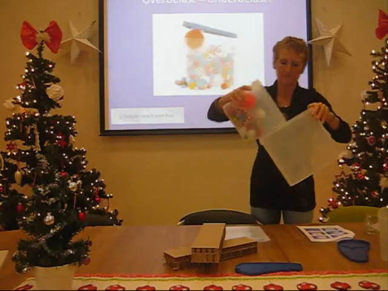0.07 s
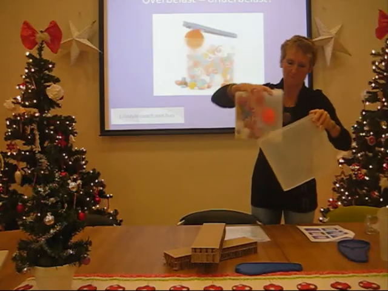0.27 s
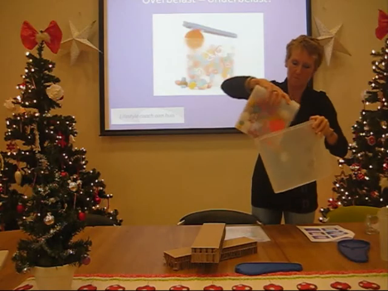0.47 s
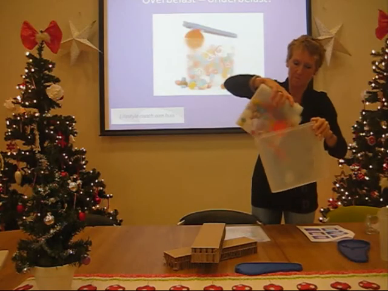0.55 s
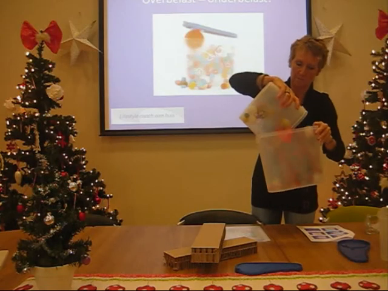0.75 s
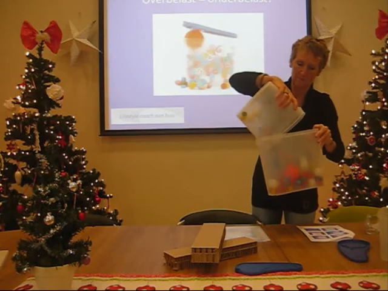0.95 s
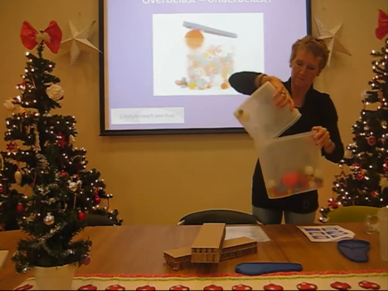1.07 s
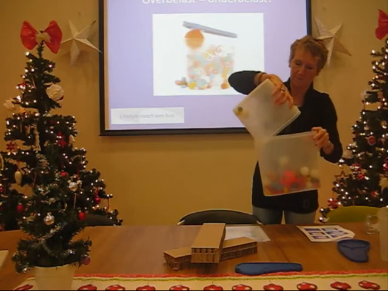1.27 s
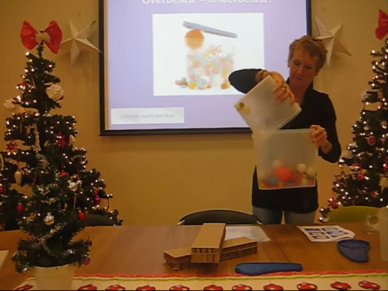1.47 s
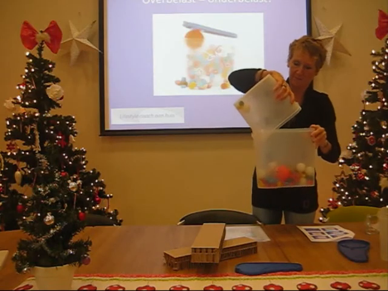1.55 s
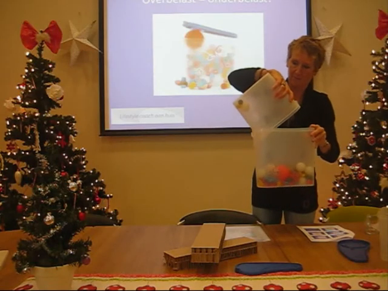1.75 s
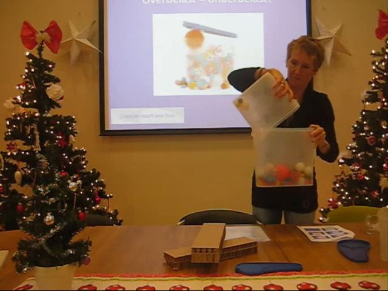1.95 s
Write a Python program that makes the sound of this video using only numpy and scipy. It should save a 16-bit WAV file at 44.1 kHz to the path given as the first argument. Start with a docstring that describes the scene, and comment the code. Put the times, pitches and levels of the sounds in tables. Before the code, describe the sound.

Small hard balls pour from a plastic box into a plastic tub. They shift and tick, fall in a loud clatter with hollow thumps, then the last few drop singly, a few metres away in a slightly echoing room.

```python
"""Small hard balls pour from a plastic box into a plastic tub, a few metres away in a meeting room.
They shift and tick, then fall in a dense clatter: every contact is a tiny crack that sets the tub
ringing, and a few heavy balls thump on its floor. The last ones drop singly and settle while
the room rings out over a soft hush and a faint electrical whine."""
import sys
import numpy as np
from scipy import signal
from scipy.fft import rfft, irfft, next_fast_len
from scipy.io import wavfile

SR = 44100
rng = np.random.default_rng(int(sys.argv[2]) if len(sys.argv) > 2 else 0)


def store_wav(level_fs):
    """Save 16-bit WAV to argv[1]."""
    pcm = np.round(np.clip(np.atleast_2d(level_fs), -1, 1) * 32767)
    wavfile.write(sys.argv[1], SR, pcm.T.astype(np.int16))


N = 88200
RADIATE_HZ = 282  # the thin plastic gives off little sound below this


def stream(hits_per_s=290, scatter_db=2.5, wall_fade_s=0.13, clatter_db=-3, wall_db=-12.5):
    """Balls collide at random; each contact clacks and rings the tub's tones in a new mix."""
    # The course of the pour. Each row: time in seconds, relative level in dB, treble boost in dB.
    pour = [(0, -36.5, -11), (.135, -40.5, -9), (.2, -30, -21), (.24, -22.5, -14), (.29, -24, 0.5),
            (.35, -16, -3), (.47, -17.5, 1), (0.508, -11.5, -1.5), (.54, -20.5, 7.5), (.66, -21, 1.5),
            (.715, -16, 6), (.745, -26.5, 12), (.86, -18, 4.5), (.95, -17, 0), (1.02, -16, 1.5),
            (1.135, -17.5, 2.5), (1.25, -17.5, -2), (1.29, -20.5, -12), (1.36, -16.5, -11),
            (1.43, -20.5, -9), (1.49, -28.5, -14), (1.57, -28.5, -17), (1.62, -38, -29), (1.68, -26, -13),
            (1.739, -29.5, -13), (1.81, -59, -19)]
    # The tones of the tub's walls and air. Each row: pitch in Hz, relative level in dB.
    wall_tones = [(310, -6.5), (350, -4), (404, -4.5), (446, -1.5), (515, -3), (940, -6), (1120, -5)]
    count = int(hits_per_s * N / SR)
    times = np.clip((np.arange(count) + rng.uniform(-2, 2, count)) / hits_per_s, 0, N / SR)
    pour_s, level_db, bright_db = np.transpose(pour)
    force = unit(amp(scatter_db * np.clip(rng.standard_normal(count), -2, 2)))
    force = force * amp(np.interp(times, pour_s, level_db)) * np.sqrt(SR / hits_per_s)
    pitch = 2182 * np.exp(0.615 * rng.standard_normal(count))  # Hz, different for each contact
    clatter = place(times, force[:, None] * contacts(np.interp(times, pour_s, bright_db), pitch))
    t, walls = np.arange(SR // 4) / SR, np.zeros(N)
    for hz, db in wall_tones:
        ring = np.sin(2 * np.pi * hz * t) * amp(-60 * t / wall_fade_s)
        blows = place(times, (force * rng.uniform(-2, 2, count))[:, None])
        walls += amp(db) * signal.fftconvolve(blows, ring / np.linalg.norm(ring))[:N]
    return amp(clatter_db) * clatter + amp(wall_db) * radiated(walls, RADIATE_HZ) / 2


def contacts(bright_db, pitch, crack_s=0.0004, ring_s=0.0035, ring_db=-5.5, size=1024):
    """One clack of equal energy per ball: a crack and a brief plastic ring around its pitch."""
    # The tone colour of a contact. Each row: frequency in Hz, relative level in dB.
    colour = [(40, -28), (110, -29), (200, -12.5), (330, 0), (1600, -1), (2800, -3), (4200, -7.5),
              (6000, -10.5), (8000, -18.5), (12000, -22.5), (15500, -34.5)]
    t, hz = np.arange(size) / SR, np.fft.rfftfreq(size, 1 / SR)
    envelope = (np.exp(-t / crack_s) + amp(ring_db) * np.exp(-t / ring_s)) * (1 - np.exp(-t / 0.00022))
    burst = rng.standard_normal((len(pitch), size)) * envelope
    peak_db, sharpness = 7, 6
    peak = 1 + amp(peak_db) / np.hypot(1, 2 * sharpness * (hz / pitch[:, None] - 1))
    treble_share = along([(1200, 0.033), (3000, 0.4), (7000, 0.94)], hz)
    gain = peak * amp(along(colour, hz) + bright_db[:, None] * treble_share)
    clack = irfft(rfft(burst) * causal(gain))
    return clack / np.linalg.norm(clack, axis=1, keepdims=True)


def clacks(gain_db=12, neighbours=4, jostle_s=0.007, jostle_db=-12):
    """Hard hits on the tub's wall stand out, each in a small flurry of jostled neighbours."""
    # Each row: start in seconds, relative level in dB, pitch in Hz, treble boost in dB.
    hard_hits = [(0.1006, -21, 1000, 1), (0.1574, -16.5, 990, -11), (0.1911, -17, 1060, -13),
                 (0.2476, 1.5, 1080, -6), (0.2703, 1, 1410, -3), (0.3945, -8, 2900, 7),
                 (0.4088, -3.5, 2230, -4), (.4474, -5, 1560, -14), (0.495, -3.5, 1360, -1),
                 (0.5127, -2.5, 1240, -2), (.564, -0.5, 1590, 5.5), (.627, -6, 1110, 6),
                 (0.6719, -7.5, 1470, -9), (0.7036, 1, 2660, 5), (0.7229, 2, 2200, -4),
                 (0.7684, -6, 2600, 11), (0.7747, -4.5, 1670, 10.5), (.778, 0, 1200, 2),
                 (0.792, 0, 1170, -3.5), (.8042, -5.5, 1590, -11), (.823, -1, 1230, 2),
                 (.9004, 2, 2550, -1), (0.9986, -3, 1430, 1), (1.1101, -5, 1580, 9), (1.1325, -4, 2920, 12),
                 (1.275, -2, 1700, 11), (1.5105, -14, 2400, 0), (1.5534, -6.5, 2500, -1),
                 (1.5826, -10.5, 2950, -8), (1.6463, -11, 1470, -8), (1.6793, -22, 5470, -1)]
    starts, db, pitch, bright_db = np.transpose(hard_hits)
    force = amp(db + gain_db)[:, None]
    hits = place(starts, force * contacts(bright_db, pitch))
    for offset in rng.uniform(-.7, .7, (len(starts), neighbours)).T:
        hits += place(starts + jostle_s * offset, amp(jostle_db) * force * contacts(bright_db, pitch))
    return radiated(hits, edge_hz=517, order=2)  # a hit on the side wall has little bass


def thumps(gain_db=-10, reach_hz=99, delay_s=0.002285):
    """Heavy balls drum on the tub's floor; where they land decides which tones answer."""
    # Each row: time in seconds, relative level in dB, the frequency in Hz it stirs most.
    landings = [(.315, -6, 476), (.625, 4, 502), (0.65, 1, 300), (.669, 3.5, 435), (.693, -2, 380),
                (.897, -7, 450), (1.273, -5, 404), (1.334, -6, 447), (1.438, -0.5, 480), (1.462, -6.5, 314),
                (1.55, -9, 465), (1.643, -4.5, 493)]
    # The floor's tones. Each row: pitch in Hz, relative level in dB, seconds to fade by 60 dB.
    floor_tones = [(325, -4.5, .045), (407, -1, .04), (446.2, -6.5, .09), (526, -6, .03), (593, -8, .04)]
    times, db, centre_hz = np.transpose(landings)
    floor_hz = np.array(floor_tones)[:, 0]
    mix = 1 / np.hypot(1, (floor_hz - centre_hz[:, None]) / reach_hz) ** 2
    thuds = amp(db + gain_db)[:, None] * (mix @ ringing(floor_tones))
    return radiated(place(times + delay_s, thuds), RADIATE_HZ)


def box_ring():
    """A ball that knocks the emptied box sets it ringing with a short, high tone."""
    # Each row: start in seconds, relative level in dB.
    ring_hits = [(.7228, -9), (0.7743, -19)]
    # The emptied box's tones. Each row: pitch in Hz, relative level in dB, seconds to fade by 60 dB.
    box_tones = [(1615, -0.5, 0.054), (2964, -3.5, 0.031)]
    starts, db = np.transpose(ring_hits)
    return place(starts, amp(db)[:, None] * ringing(box_tones).sum(axis=0))


def chatters(rise_s=0.00095, decay_s=0.0048):
    """Two balls glance off each other with a thin buzz a few milliseconds long."""
    # Each row: start in seconds, relative level in dB.
    glances = [(.209, -34), (1.3884, -10.5), (1.411, -25), (1.421, -21), (1.697, -29)]
    # The tone colour of the buzz. Each row: frequency in Hz, relative level in dB.
    colour = [(300, -70), (2500, -14), (3900, 3.5), (5000, -6.5), (6200, -8.5), (10500, -13.5),
              (15000, -22)]
    starts, db = np.transpose(glances)
    t = np.arange(SR // 10) / SR
    envelope = place(starts, amp(db)[:, None] * np.exp(-t / decay_s) * (1 - np.exp(-t / rise_s)))
    return envelope * noise(colour)


def bumps():
    """Soft low knocks as the tipped box meets the tub's rim."""
    # Each row: start in seconds, relative level in dB, pitch in Hz, rise time in seconds.
    knocks = [(.215, -21.5, 178, 0.0072), (1.272, -34, 75, 0.0024)]
    starts, db, hz, rise = np.transpose(knocks)[:, :, None]
    t = np.arange(SR // 10) / SR
    envelope = amp(db) * t / rise * np.exp(-t / rise)
    return place(starts[:, 0], envelope * np.sin(2 * np.pi * hz * t))


def room(x, count=12):
    """Random echo patterns fade into one another, so the room rings smoothly with no fixed pitch."""
    spot = np.linspace(0, count - 1, N)
    fades = (np.sqrt(np.maximum(1 - np.abs(spot - k), 0)) for k in range(count))
    return sum(signal.fftconvolve(x * fade, room_answer())[:N] for fade in fades)


def room_answer(echoes=8, echo_db=-13.5, tail_db=-5.5):
    """The table and near walls send back a few echoes; then comes a tail whose treble dies first."""
    # Each row: frequency in Hz, seconds for the tail to fade by 60 dB.
    fade_times = [(150, 0.81), (1500, 0.9), (3500, 0.56), (7000, 0.4)]
    hz, t, spectrum = signal.stft(rng.standard_normal(SR * 3 // 4), SR, nperseg=256)
    tail = signal.istft(spectrum * amp(-60 * t / along(fade_times, hz)[:, None]), SR, nperseg=256)[1]
    tail = tail * (1 - np.exp(-np.arange(len(tail)) / SR / 0.0083))  # swells in quickly
    answer = amp(tail_db) * tail / np.linalg.norm(tail)
    delays = rng.uniform(.003, .028, echoes)
    answer[(delays * SR).astype(int)] += amp(echo_db) * rng.choice([-1, 1], echoes) / np.sqrt(echoes)
    return answer


def background(hush_db=-44):
    """The room's steady hush with a faint electrical whine."""
    # The tone colour of the hush. Each row: frequency in Hz, relative level in dB.
    colour = [(25, -6), (60, -5.5), (170, 7.5), (450, 7), (1200, -2), (7000, -11.5), (15000, -16)]
    # Each row: pitch in Hz, level in dB.
    whine_tones = [(7558, -62.5), (15149, -64)]
    t = np.arange(N) / SR
    whine = sum(amp(db) * np.sqrt(2) * np.sin(2 * np.pi * hz * t) for hz, db in whine_tones)
    return amp(hush_db) * noise(colour) + whine


def radiated(x, edge_hz, order=3):
    """The bass of a small plastic panel cancels around its edges."""
    return signal.sosfilt(signal.butter(order, edge_hz, "high", fs=SR, output="sos"), x)


def ringing(tones):
    """One dying sine wave per tone."""
    t = np.arange(SR // 5) / SR
    return np.array([amp(db - 60 * t / fade_s) * np.sin(2 * np.pi * hz * t) for hz, db, fade_s in tones])


def noise(colour):
    """Steady noise with the given tone colour."""
    return unit(filtered(rng.standard_normal(N), lambda hz: amp(along(colour, hz))))


def amp(db):
    """Turn decibels into a gain."""
    return 10 ** (np.asarray(db) / 20)


def unit(x):
    """Scale to an average (rms) level of 1."""
    return x / np.sqrt(np.mean(x ** 2) + 1e-20)


def along(points, hz):
    """Read between (Hz, value) points on a log frequency scale."""
    point_hz, values = np.transpose(points)
    return np.interp(np.log(hz + 1), np.log(point_hz + 1), values)


def filtered(x, response):
    """Scale each frequency in x by the gain that response gives it."""
    size = next_fast_len(N + 8192)
    return irfft(rfft(x, size) * response(np.fft.rfftfreq(size, 1 / SR)), size)[:N]


def causal(gain):
    """Turn each row of gains into a filter that rings only after the hit (minimum phase)."""
    cepstrum = irfft(np.log(np.maximum(gain, 1e-6)))
    half = cepstrum.shape[-1] // 2
    return np.exp(rfft(cepstrum * np.r_[1, np.full(half - 1, 2), 1, np.zeros(half - 1)]))


def place(times, sounds):
    """Add up the sounds, one per row, each starting at its time."""
    at = np.maximum(np.round(times * SR), 0).astype(int)[:, None] + np.arange(sounds.shape[1])
    return np.bincount(at.ravel(), sounds.ravel(), N)[:N]


def scene():
    """The pour, its room and the background, in one channel."""
    balls = stream() + clacks() + box_ring() + chatters() + thumps() + bumps()
    return (balls + room(balls) + background())[None]


def record(dry):
    """Round off the loudest peaks at full scale and cut the highest treble."""
    rounded = dry[0] / (1 + np.abs(dry[0]) ** 6) ** (1 / 6)
    return filtered(rounded, lambda hz: hz < 15700)[None]


dry = scene()
out = record(dry)
store_wav(out)
```